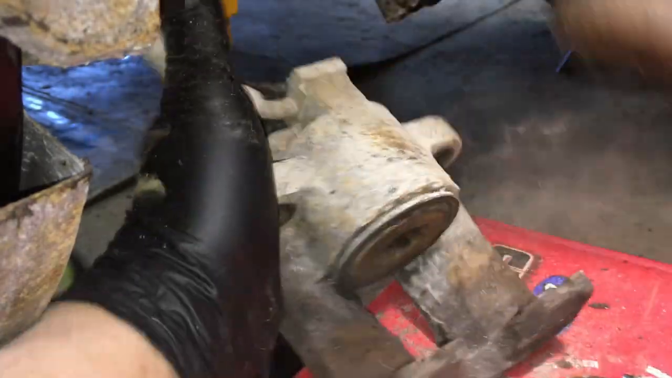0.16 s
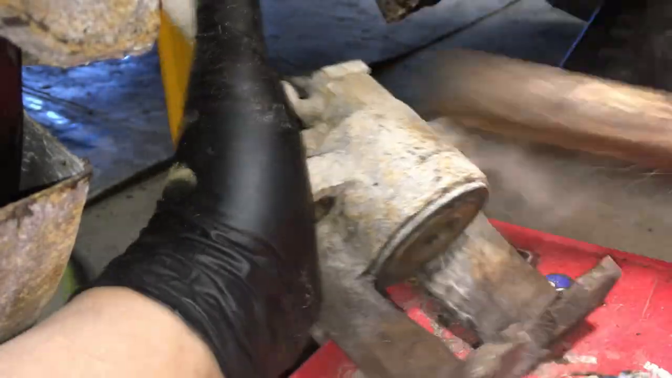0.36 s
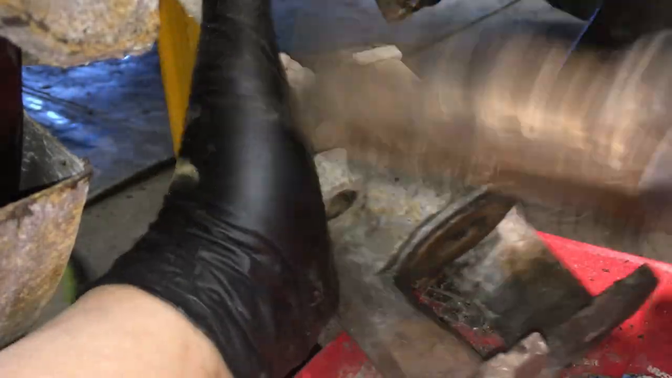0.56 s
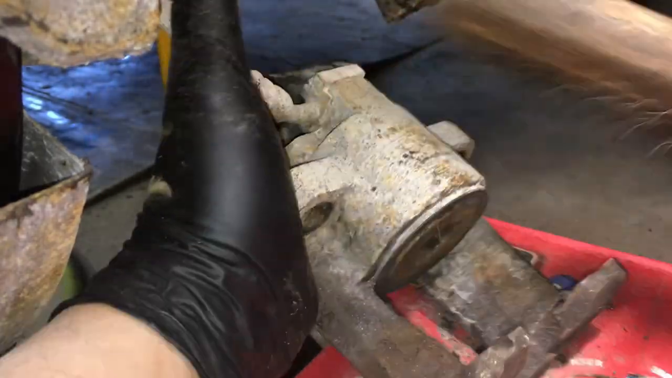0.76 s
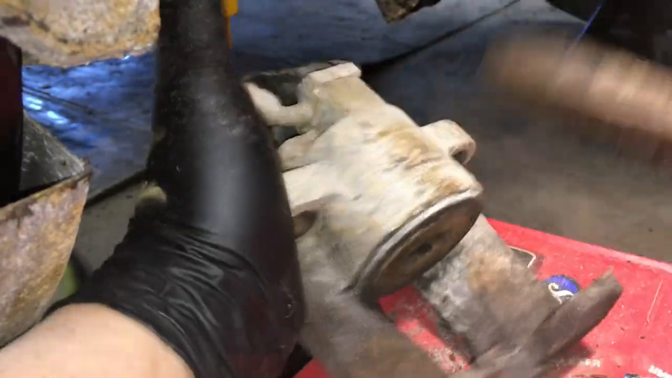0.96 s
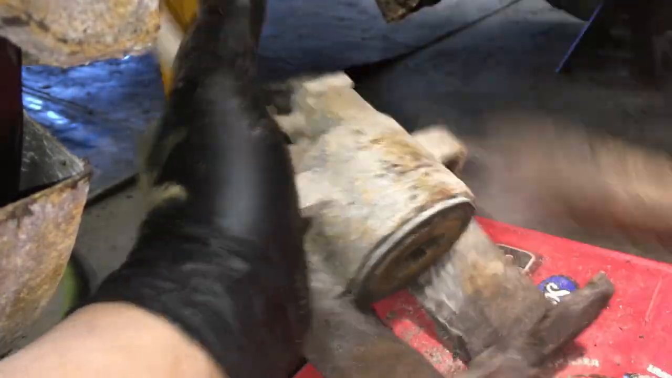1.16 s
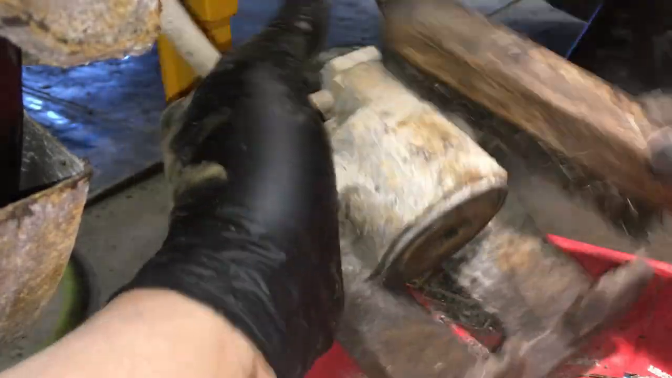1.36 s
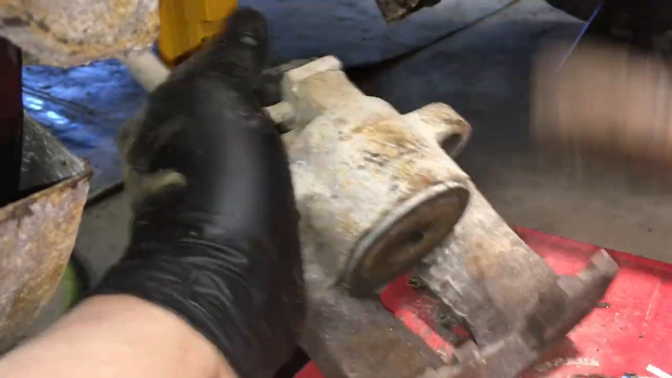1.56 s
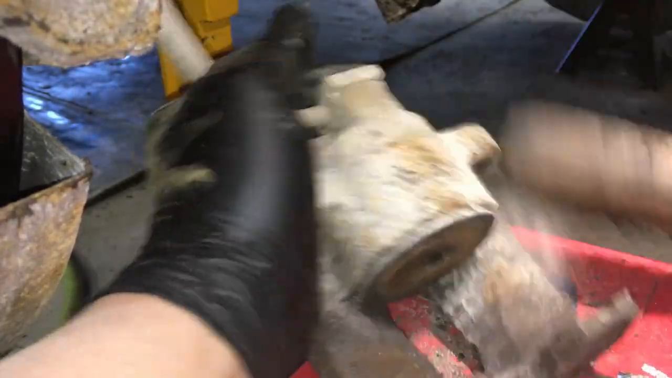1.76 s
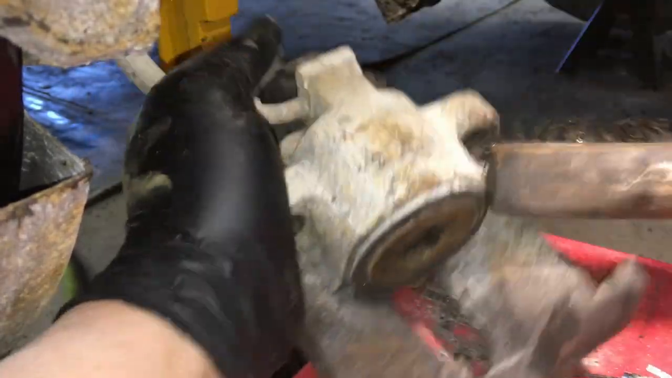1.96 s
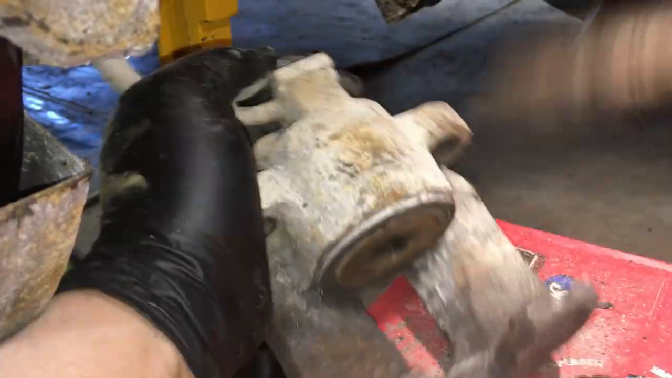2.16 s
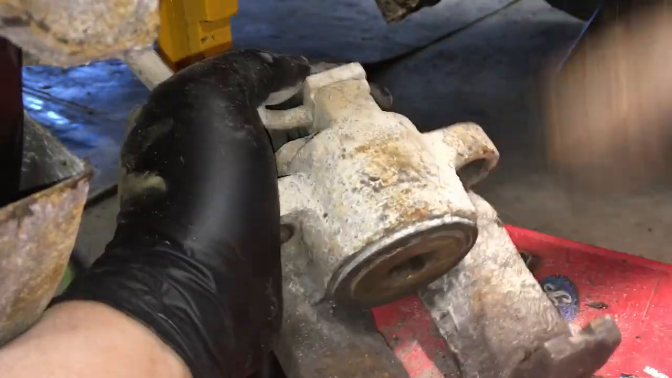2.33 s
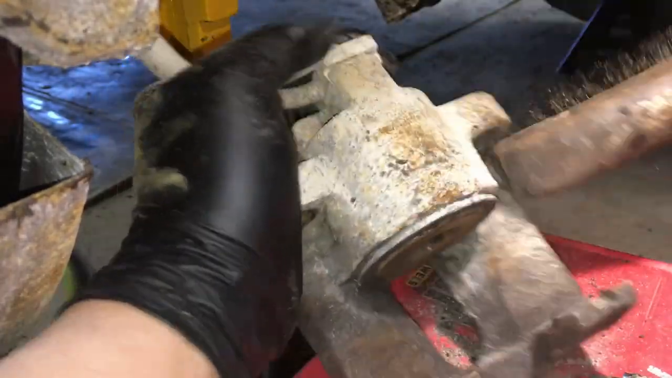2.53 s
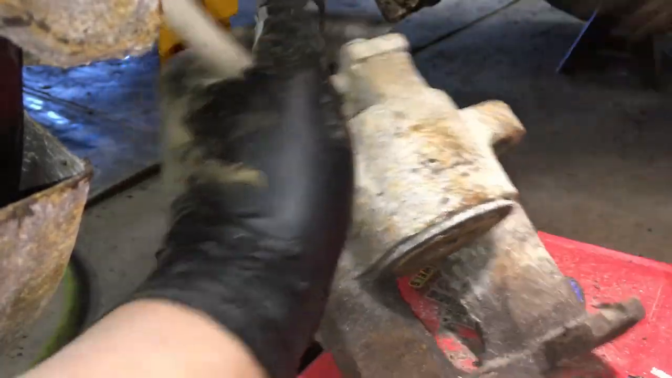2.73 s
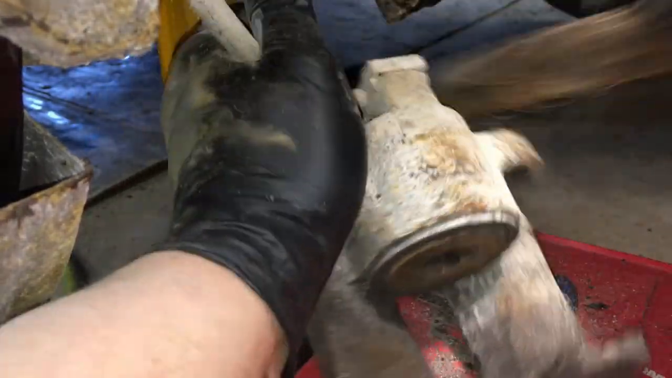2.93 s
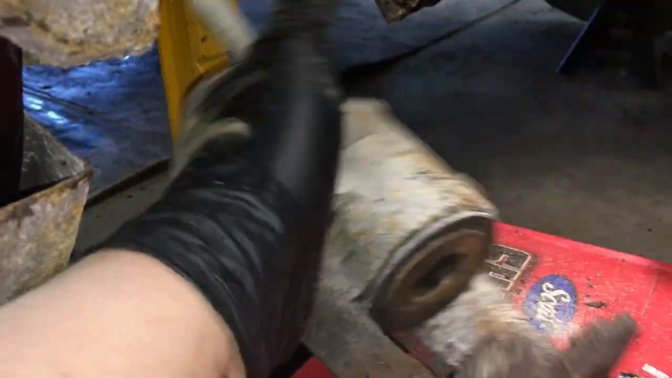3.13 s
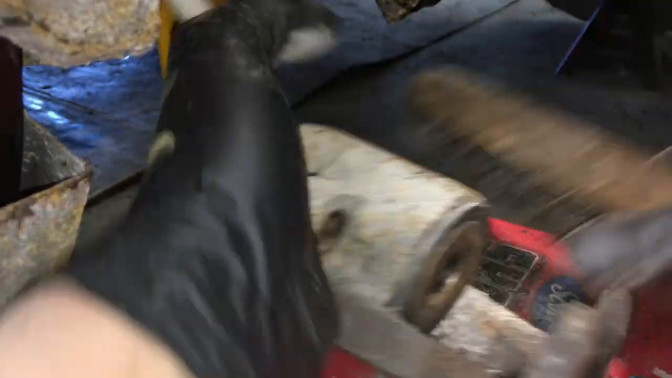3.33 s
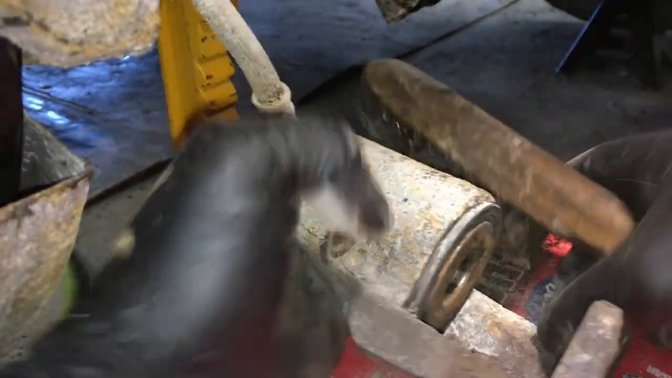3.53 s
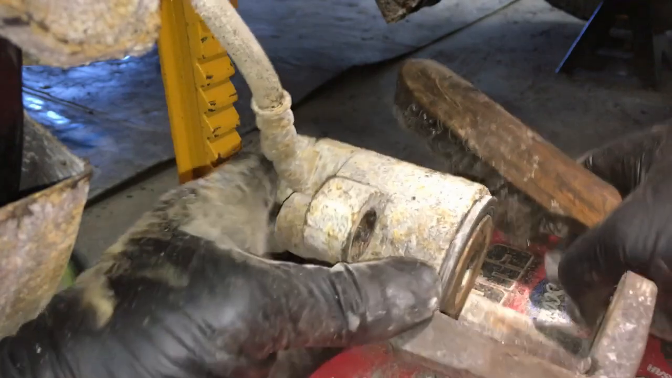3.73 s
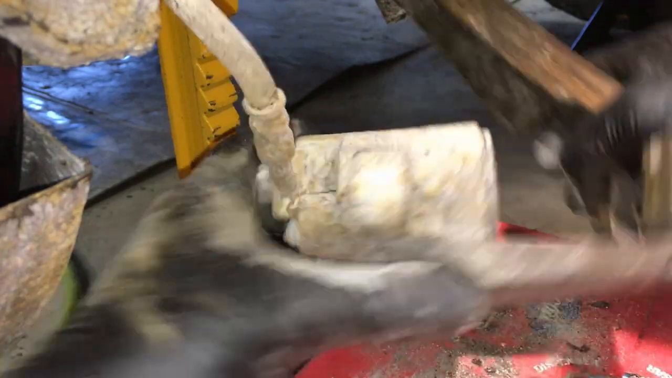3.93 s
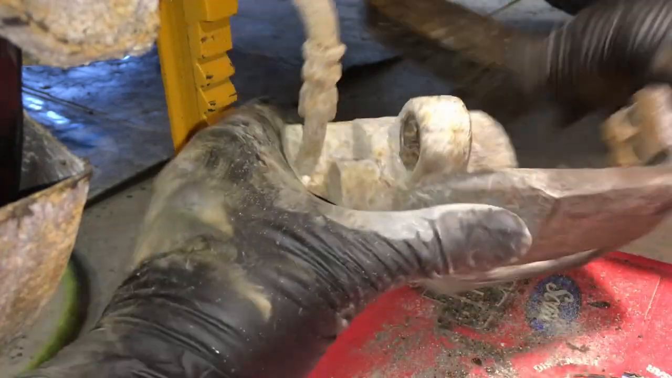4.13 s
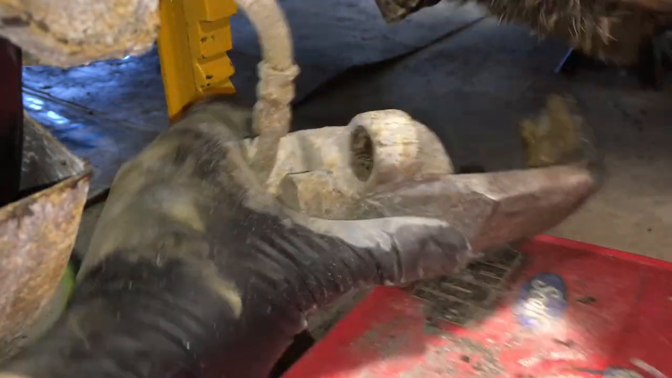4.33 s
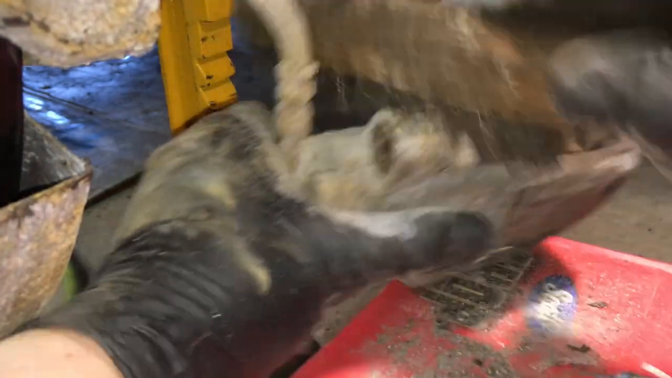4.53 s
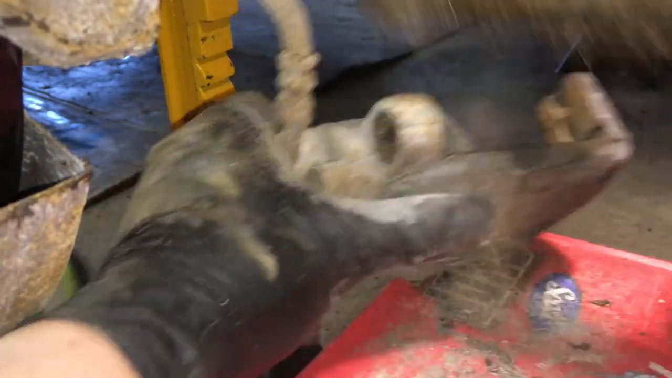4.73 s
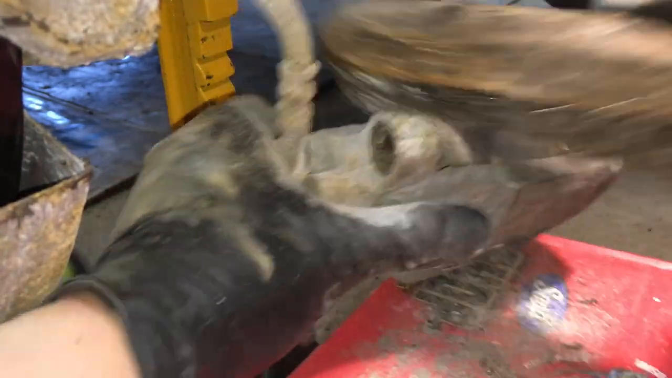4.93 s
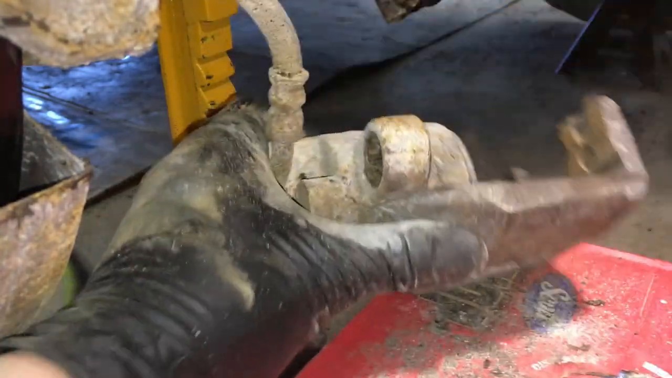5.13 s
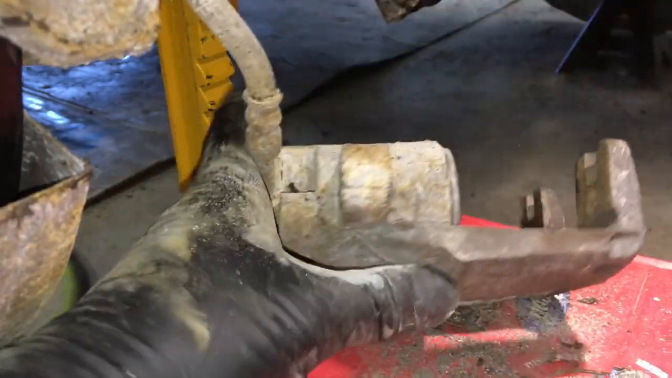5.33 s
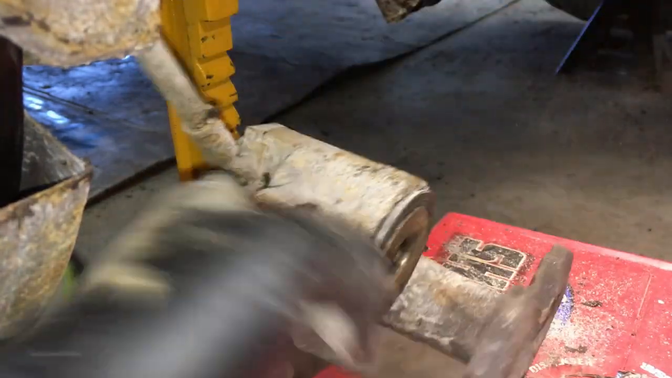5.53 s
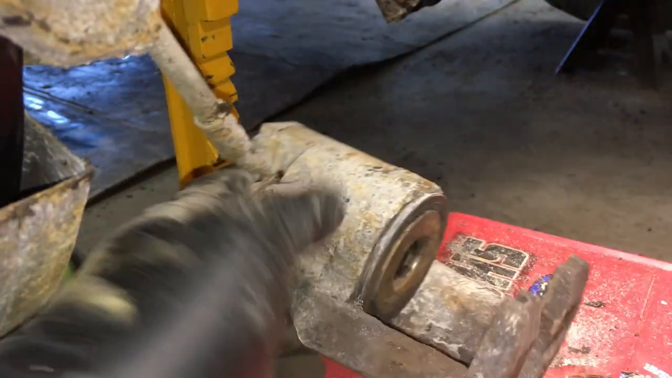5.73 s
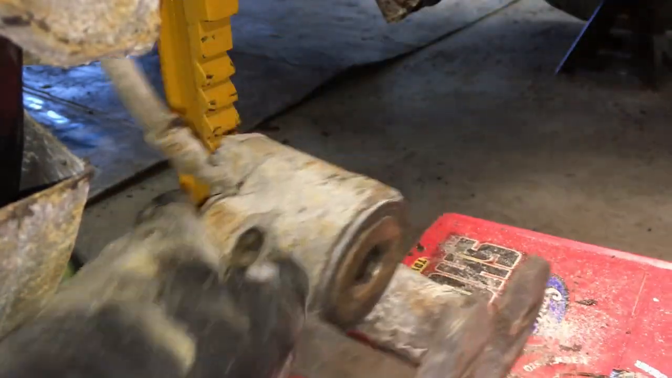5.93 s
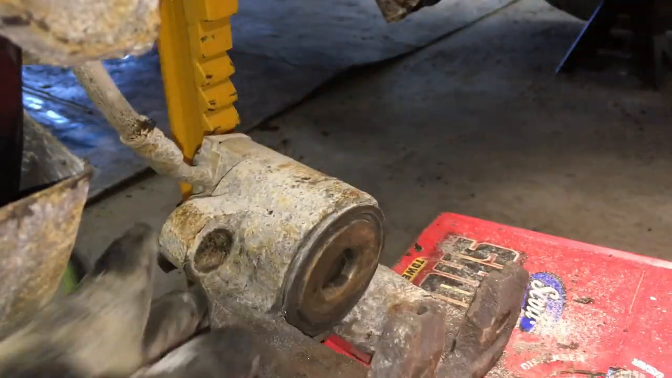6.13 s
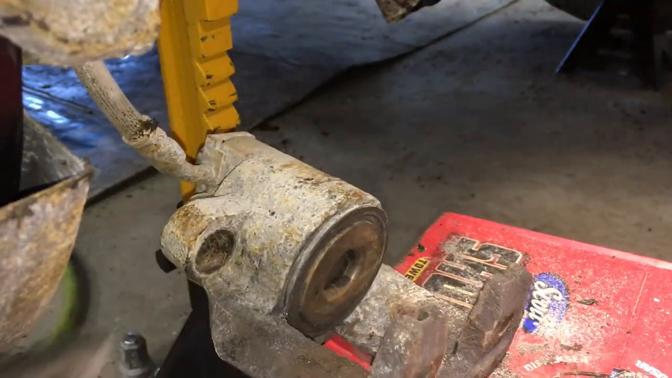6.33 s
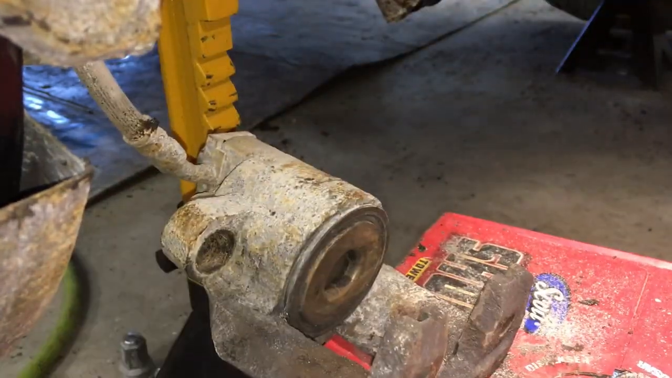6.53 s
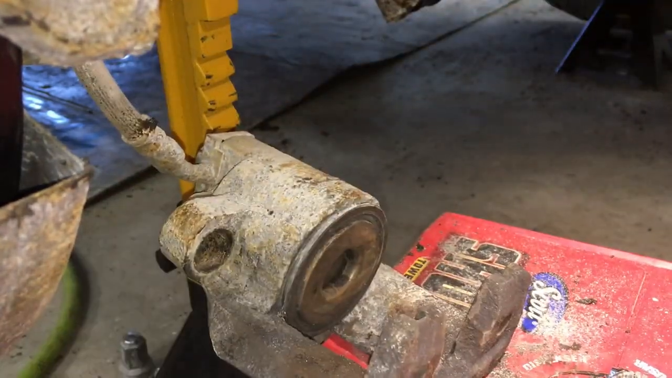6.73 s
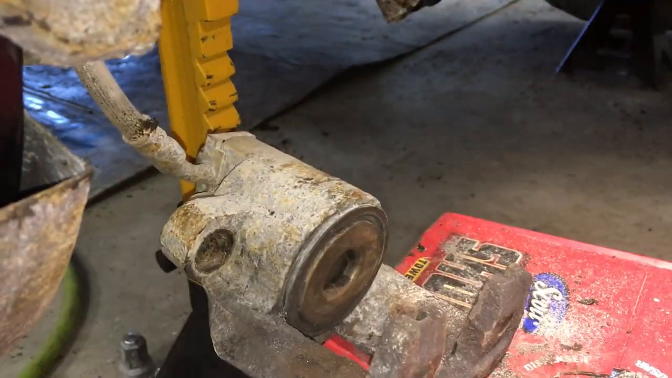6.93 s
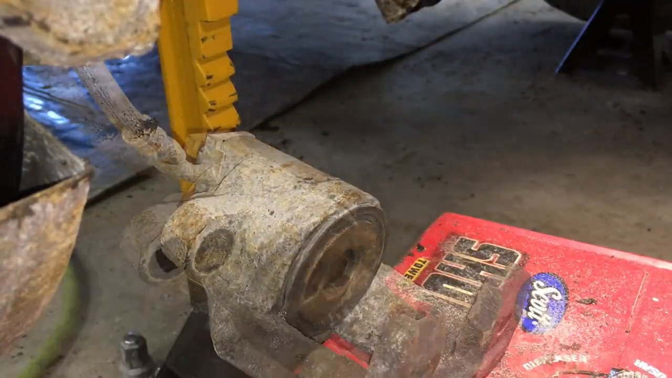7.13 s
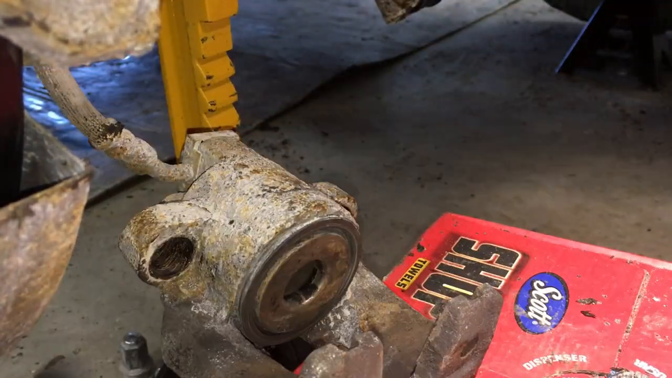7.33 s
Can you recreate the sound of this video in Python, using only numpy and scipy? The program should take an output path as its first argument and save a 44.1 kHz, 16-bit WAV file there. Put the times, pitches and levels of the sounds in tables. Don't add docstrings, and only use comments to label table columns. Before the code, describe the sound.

Close up in a garage, bristles rasp back and forth over rough metal, some bursts swelling and others striking and skidding out. Dull cardboard drumming and woody clacks accompany the early strokes. Around the middle the part is turned, with sparser scrapes, then heavier brushing and crackling clicks return. The last second or so holds only faint rubs and low background hush, nearly mono.

```python
import sys
import numpy as np
from scipy import signal
from scipy.io import wavfile
from scipy.ndimage import uniform_filter1d

SR = 44100
rng = np.random.default_rng(int(sys.argv[2]) if len(sys.argv) > 2 else 0)


def rack_gain(trim_db):
    fader = np.asarray(trim_db, float)
    return 10 ** (fader / 20)


def master_out(mix):
    frames = np.transpose(np.atleast_2d(mix))
    ceiling = np.clip(frames, -1, 1)
    pcm = np.round(ceiling * 32767).astype(np.int16)
    wavfile.write(sys.argv[1], SR, pcm)


N = 325308

# hz, level_db (per Hz)
SCRATCH_SPECTRUM = [(900, -36.5), (2200, 3.5), (2810, -6), (3430, 1), (4830, -2.5), (9310, -0.5),
                    (10500, -3), (12000, 2), (14700, 0.5), (15600, 1.5), (16000, -36.5)]
# hz, level_db (per Hz)
RASP_SPECTRUM = [(300, -24), (470, -6), (725, -5), (1030, -2), (1790, -4), (2170, -5), (2800, -7),
                 (5000, -18), (9000, -66.5)]
# pitch_hz, width_hz, level_db
WIRE_MODES = [(3195, 410, -11), (5750, 650, -8), (9550, 500, -3.5), (11200, 970, -6)]
# pitch_hz, width_hz, level_db
HANDLE_MODES = [(583, 160, 2), (713, 180, 0), (927, 600, -1), (1376, 190, -1)]
# pitch_hz, width_hz, level_db
AIR_MODES = [(52.7, 31, 6.5), (90.2, 87, -2)]
# start_s, peak_db, ring_hz
GRIT_TICKS = [(6.198, -15.5, 6240), (6.3464, -25, 5830), (6.3632, -22, 5900), (6.393, -24, 5460),
              (6.456, -29, 4500), (6.608, -39, 6500), (6.647, -27, 5200)]
NEEDLE = 3.5


def evened(x):
    return x / np.sqrt(np.mean(x ** 2) + 1e-20)


def read(points, hz):
    f, value = np.transpose(points)
    return np.interp(np.log(hz + 1), np.log(f + 1), value)


def add(mix, s, sound):
    part = mix[max(round(s * SR), 0):][:len(sound)]
    part += sound[:len(part)]


def colour(x, points):
    hz = abs(np.fft.fftfreq(4096, 1 / SR))
    log_gain = np.log(rack_gain(np.maximum(read(points, hz), -100)))
    taps = np.fft.ifft(np.exp(np.conj(signal.hilbert(log_gain)))).real[:2048]
    return signal.oaconvolve(x, taps)[:len(x)]


def resonate(x, hz, width):
    r = np.exp(-np.pi * width / SR)
    return 2 * signal.lfilter([1 - r], [1, -r * np.exp(2j * np.pi * hz / SR)], x).real


def split_band(x, hz, kind):
    return signal.sosfilt(signal.butter(2, hz, kind, fs=SR, output="sos"), x)


def wobble(seconds):
    size = max(round(seconds * SR), 1)
    smooth = uniform_filter1d(rng.standard_normal(N), size)
    return evened(uniform_filter1d(smooth, size))


def mottle(x, depth_db):
    z = signal.stft(x, nperseg=256, noverlap=192)[2]
    patches = uniform_filter1d(rng.standard_normal(z.T.shape), 14, 0)
    patches = uniform_filter1d(patches, 6, 1).T
    z = z * rack_gain(depth_db * evened(patches))
    return evened(signal.istft(z, nperseg=256, noverlap=192)[1][:N])


def brush():
    scratch_db, rasp_db, drum_db, bright_db = contact()
    grip_db = 1.94 * wobble(0.0012) + 2.3 * wobble(0.0049)
    grip = rack_gain(grip_db)
    wires = slips(3000, 1.2, 1.6) * grip
    scratch = wire_scratch(wires, grip, bright_db) + lifted_casting(wires, grip_db)
    rasp = casting_rasp(wires, grip, rasp_db) * rack_gain(rasp_db + 1.13)
    flick_db = -16 - 0.26 * rasp_db
    push = rng.standard_normal(N) * grip
    drum_rms = np.std(panels(push))
    drum = panels(push * rack_gain(scratch_db + drum_db - 0.5)) / drum_rms
    return rack_gain(scratch_db - 1.9) * (scratch + rasp + flicks() * rack_gain(flick_db)) + drum


def contact():
    # start_s, length_s, peak_db, weight_db
    sweeps = [(0.0, 0.06, -32.5, -4), (.066, 0.089, -35.5, -3.5), (.614, 0.074, -37, 0),
              (.791, 0.015, -21.5, -14), (1.281, 0.063, -29.5, -5.5), (1.369, 0.0077, -17, -6),
              (2.598, 0.066, -31.5, -5), (2.787, 0.17, -48, -7), (3.029, 0.062, -32.5, -3),
              (3.448, 0.05, -42.5, -1), (3.86, 0.068, -32.5, -2.5), (4.007, 0.12, -46, -8.5),
              (4.25, 0.053, -45.5, -11.5), (4.535, 0.098, -44, 7.5), (5.299, 0.065, -33.5, 2),
              (5.528, 0.026, -47, 17), (5.612, 0.064, -31.5, 0), (5.806, 0.14, -50, 3),
              (6.023, 0.041, -30, -5.5), (7.25, 0.125, -54.5, 10.5)]
    # start_s, length_s, peak_db, weight_db
    skids = [(.32, 0.051, -37.5, -4), (.706, 0.0086, -34, 5.5), (.952, 0.06, -32.5, 1),
             (1.075, 0.034, -24.5, -5.5), (1.187, 0.15, -47, 3.5), (1.383, 0.12, -36, 0.5),
             (1.465, 0.16, -39, 0), (1.626, 0.04, -27, -2.5), (1.691, 0.21, -50, -5),
             (1.819, 0.018, -48, 13), (1.966, 0.15, -46, 0), (2.221, 0.012, -36, 10.5),
             (2.442, 0.12, -55, -17), (2.664, 0.024, -33, 15.5), (3.096, 0.16, -31.5, 0.5),
             (3.33, 0.099, -29.5, -3), (3.508, 0.071, -27.5, -3.5), (4.44, 0.092, -47.5, 5.5),
             (4.637, 0.034, -45, -1), (4.718, 0.17, -30.5, -2), (5.177, 0.024, -46, 12),
             (5.367, 0.041, -34, 2.5), (5.448, 0.03, -51.5, 25), (5.687, 0.095, -29.5, -3.5),
             (5.889, 0.063, -31.5, -5), (6.064, 0.18, -25.5, -7)]
    # start_s, length_s, level_db, weight_db
    scrubs = [(.196, 0.12, -34.5, -2), (.406, 0.22, -38.5, -1), (.809, 0.057, -33.5, -5),
              (1.05, 0.027, -39.5, 5), (1.572, 0.046, -34, -14.5), (1.852, 0.11, -38, -5.5),
              (2.126, 0.067, -49, -8.5), (2.27, 0.043, -43, 1.5), (2.332, 0.013, -37, -11),
              (2.379, 0.058, -37.5, -2.5), (2.709, 0.054, -44.5, -5), (2.95, 0.074, -44, 1.5),
              (3.269, 0.046, -41, -5), (3.659, 0.088, -45.5, -3), (4.182, 0.014, -49.5, -2.5),
              (4.386, 0.037, -35.5, 4), (4.678, 0.036, -42.5, -8.5), (5.04, 0.07, -47.5, -11.5),
              (5.097, 0.078, -35.5, -3), (6.338, 0.17, -51.5, -4), (6.69, 0.084, -60, -5.5),
              (7.03, .05, -72, -4), (6.88, 0.043, -71, -5), (7.175, 0.037, -65, -1.5)]
    # start_s, light_drag_db, brush_angle_brightness_db, seat_on_box_db
    hands = [(0, -48.5, 0, 1), (.76, -56, -1.5, -3), (1.2, -53, -3, -1), (1.8, -95, -8.5, -1.5),
             (2.3, -46, -3, 8), (2.56, -58.5, -3, 3), (2.9, -53.5, -1.5, -2.5), (3.5, -54, -4.5, -2.5),
             (4.2, -56, -9, -7), (4.35, -61, -3, -9.5), (5, -57, -8, 1.5), (5.5, -53.5, -6.5, -4.5),
             (6, -49, -7, -0.5), (6.5, -68, -11.5, -4.5), (6.55, -60, -14, 2), (6.75, -70, -22, -2),
             (7.16, -74, -16, -1), (7.38, -55, -29, -11)]
    touch_s, lift_db_per_s = 0.016, 1208
    t = np.arange(0, N / SR + .002, .001)
    hand_s = np.array(hands)[:, 0]
    drag_db, angle_db, seat_db = (np.interp(t, hand_s, v) for v in np.transpose(hands)[1:])
    power = rack_gain(2 * drag_db)
    load = power * -1
    for rows, swell_db, skid_db, lifts in ((sweeps, 13, 0, 1), (skids, 0, 15, 0), (scrubs, 0, 0, 1)):
        s, length, db, weight_db = np.transpose(rows)[:, :, None]
        done = np.maximum(t - s, 0) / length
        level_db = db - swell_db * (1 - np.minimum(done, 1)) - skid_db * done
        level_db = level_db - lifts * lift_db_per_s * np.maximum(t - s - length, 0)
        onset = np.clip((t - s) / touch_s + .5, 0, 1)
        part = rack_gain(2 * np.maximum(level_db, -150)) * onset ** 2
        power = power + part.sum(0)
        load = load + (part * weight_db).sum(0)
    weight_db = uniform_filter1d(load / power, 9)
    scratch_db = 10 * np.log10(power)
    drum_db = 1.48 * weight_db + seat_db
    bright_db = angle_db - 0.61 * weight_db
    curves = scratch_db, weight_db, drum_db, bright_db
    return [np.interp(np.arange(N) / SR, t, c) for c in curves]


def slips(per_s, spread_db, fizz):
    size = rack_gain(spread_db * np.minimum(rng.exponential(1, N), 4)) * rng.choice([-1., 1.], N)
    clicks = evened(size * (rng.random(N) < per_s / SR))
    return clicks + fizz * rng.standard_normal(N)


def wire_scratch(wires, grip, bright_db):
    hiss = mottle(colour(wires, SCRATCH_SPECTRUM), 3.4)
    rings = 0
    for hz, width, db in WIRE_MODES:
        level = rack_gain(db + 5.0 * wobble(0.098))
        drive = slips(140, 1.3, 0) * grip + 0.31 * wires
        rings = rings + level * evened(resonate(drive, hz, width))
    lone = evened(colour(slips(110, 1.7, 0), SCRATCH_SPECTRUM))
    scratch = evened(hiss + 0.13 * rings + 0.38 * lone)
    low = split_band(scratch, 7500, "low")
    sing = rack_gain(1.7 * wobble(0.037) - 0.3 * np.clip(bright_db, -6, 6) - 3.0)
    brush_on = np.arange(N) / SR < 5.8
    low = low + sing * resonate(low, *WIRE_MODES[0][:2]) * brush_on
    high = split_band(scratch, 7500, "high")
    share = 1 / (1 + rack_gain(2 * bright_db))
    balanced = np.sqrt(share) * evened(low) - np.sqrt(1 - share) * evened(high)
    return balanced + rack_gain(-1.0) * singing(hiss)


def singing(scratch):
    # start_s, length_s, level_db (re scratch), pitch_hz
    drags = [(0.534, 0.041, 0.5, 3130), (.604, 0.0078, 6, 3170), (0.814, 0.023, 1.5, 3140),
             (1.855, 0.1, -4, 3100), (2.183, 0.011, 17.5, 3480), (2.333, 0.018, 1, 3740),
             (2.686, 0.063, 3.5, 3900), (3.09, 0.073, -13, 3840), (4.735, 0.074, -4, 3480),
             (5.061, 0.055, 5.5, 3460), (5.166, .025, -3, 3380), (6.88, 0.045, 6, 2140),
             (6.886, 0.058, 5, 1580)]
    t, out = np.arange(N) / SR, 0
    for s, length, db, hz in drags:
        width = 0.18 * hz
        gate = np.clip(np.minimum(t - s, s + length - t) / 0.016 + .5, 0, 1)
        tone = resonate(resonate(scratch, hz, width), hz, 2 * width)
        out = out + rack_gain(db) * gate * evened(tone)
    return out


def lifted_casting(wires, grip_db):
    # start_s, end_s
    clear = [
        (2.84, 2.935),
        (6.87, 6.96),
    ]
    t = np.arange(N) / SR
    free = sum((t > a) & (t < b) for a, b in clear)
    return free * rack_gain(-3 + grip_db) * evened(resonate(wires, 2190, 400))


def casting_rasp(wires, grip, rasp_db):
    rasp = mottle(colour(0.38 * wires + slips(1500, 1.0, 0.95) * grip, RASP_SPECTRUM), 2.2)
    wood = evened(sum(rack_gain(db) * resonate(rasp, hz, w) for hz, w, db in HANDLE_MODES))
    return (rasp + rack_gain(1.43 * rasp_db - 11.0) * wood) / np.sqrt(1 + rack_gain(rasp_db - 3.0) ** 2)


def flicks():
    per_s = 78 / len(WIRE_MODES)
    ticks = sum(evened(resonate(slips(per_s, 1.5, 0), hz, 0.3 * w)) for hz, w, _ in WIRE_MODES)
    return evened(split_band(ticks, 2800, "high"))


def panels(push):
    # pitch_hz, width_hz, level_db
    panel_modes = [(172, 48, 2), (240, 90, 2), (310, 85, 2)]
    return sum(rack_gain(db) * resonate(resonate(push, hz, w), hz, 2 * w) for hz, w, db in panel_modes)


def snaps():
    # start_s, peak_db, knock_db (re peak)
    long_snaps = [(0.253, -14, -3), (0.511, -16, -33), (1.052, -19, -9.5), (1.0776, -21.5, 4.5),
                  (1.282, -18.5, -11), (1.3716, -5.5, -5), (1.856, -23, -7), (1.946, -29, -29),
                  (2.187, -18.5, -12), (3.0593, -17.5, -18.5), (3.112, -11, -1.5), (3.173, -19, -25),
                  (3.2134, -14, -28), (3.915, -13, -25), (4.7137, -26, -21), (5.0436, -13.5, -15.5),
                  (5.4523, -12.5, -6.5)]
    # start_s, peak_db, knock_db (re peak)
    mid_snaps = [(1.474, -13.5, -13.5), (3.324, -17, -10), (3.3378, -2, -12), (3.3776, -14, -0.5),
                 (3.732, -16.5, -7), (3.8738, -13, -22), (4.8462, -9, -44), (5.544, -13.5, -6),
                 (5.687, -7, -14.5), (5.7581, -10.5, -43), (5.9389, -14, -38), (6.0189, -12, -19),
                 (6.0391, -16.5, -7), (6.0624, -8, -29), (6.073, -11, -32), (6.087, -20, -34),
                 (6.1394, -4, -20)]
    # start_s, peak_db, knock_db (re peak)
    short_snaps = [(.021, -7.5, -35), (0.0983, -3.5, -24.5), (0.2362, -17, -13), (0.798, -4.5, -38),
                   (1.505, -11.5, -16), (2.2183, -18, -34), (2.3031, -11, -19), (2.6636, -22, 5),
                   (2.7503, -8.5, -43), (2.953, -18.5, -11), (3.4065, -14, -18), (3.515, -9, -41),
                   (4.896, -17.5, -6.5), (5.2802, -20.5, -5), (5.889, -14.5, -25)]
    # start_s, peak_db
    stub_snaps = [(0.2028, -3.5), (0.6598, -10), (0.9539, -14.5), (2.3967, -19), (2.4158, -7.5),
                  (2.642, -10), (2.826, -11.5), (3.2795, -12)]
    snap_hz = [3830, 6600, 9600, 13000]
    tick_knock_db = -23.5
    rows = []
    for table, hz in zip((long_snaps, mid_snaps, short_snaps), snap_hz):
        rows += [(s, db, hz, knock_db) for s, db, knock_db in table]
    rows += [(s, db, snap_hz[-1], tick_knock_db) for s, db in stub_snaps]
    rows += [(*tick, tick_knock_db) for tick in GRIT_TICKS]
    out, t = np.zeros(N), np.arange(2200) / SR
    grit = rng.standard_normal((len(rows), 2, len(t)))
    fade = rack_gain(-60 * t / 0.0051) + 0.23 * rack_gain(-60 * t / 0.044)
    fade = fade * np.minimum(t / 0.00042, 1)
    grit[:, :, 8] = NEEDLE
    fade[8] = 1
    for (s, db, hz, knock_db), (a, b) in zip(rows, grit):
        crack = colour(a * fade, SCRATCH_SPECTRUM)
        crack = crack + 3.8 * resonate(crack, hz * (1 + .04 * b[0]), 1400)
        knock = colour(b * fade, RASP_SPECTRUM)
        knock = rack_gain(knock_db + 4.0) * knock / abs(knock).max()
        add(out, s, rack_gain(db - 2.0) * (crack / abs(crack).max() + knock))
    return out


def tips():
    # start_s, peak_db, ring_hz
    sprung_tips = [(0.0387, -9, 8300), (0.0491, -4, 14200), (0.0553, -14, 9300), (0.0606, -2.5, 14000),
                   (0.0934, -26, 9400), (0.1191, -16, 15200), (0.1229, -18, 11300), (0.1332, -9, 9900),
                   (0.1465, -22, 14500), (0.2465, -7, 13900), (0.2559, -7, 15100), (0.3046, -11, 9900),
                   (0.3164, -15, 9250), (0.4072, -21, 2980), (0.4115, -17, 14100), (0.4168, -13, 8400),
                   (0.4832, -19, 14500), (0.5793, -13, 14700), (0.5899, -16, 14000), (0.8059, -3, 9000),
                   (1.0763, -9, 2400), (1.3299, -18, 13000), (1.39, -25, 2600), (1.6343, -12, 11300),
                   (1.8719, -20, 3400), (1.9469, -6, 9200), (2.2194, -9.5, 11000), (2.3869, -15.5, 14200),
                   (2.4048, -6, 10700), (2.4325, -7, 9600), (2.609, -14, 2600), (2.6632, -6, 15000),
                   (2.6733, -9, 9600), (2.6827, -14, 9400), (2.7512, -12, 14300), (2.8964, -17.5, 9000),
                   (2.9235, -33, 2700), (2.9638, -14, 14300), (2.9773, -14, 14800), (3.1654, -9, 11700),
                   (3.1743, -6.5, 13000), (3.183, -11.5, 2280), (3.2548, -17.5, 15000), (3.3009, -24, 12400),
                   (3.3777, -0.5, 7460), (3.4065, -7.5, 7460), (3.4321, -15.5, 2660), (3.5233, -11, 9600),
                   (3.576, -14.5, 3280), (3.613, -15, 7000), (3.842, -18.5, 5770), (4.681, -20.5, 3910),
               (4.912, -13.5, 6600), (5.1, -27, 3500), (1.377, -8, 3870), (5.375, -10, 5280),
               (5.6918, -1.5, 6450), (6.2404, -21, 4020), (6.273, -24, 5790), (6.4124, -25, 5500),
                   (5.559, -15, 6040), (5.6438, -17, 2400), (5.6706, -13, 11200), (5.7052, -9, 12100),
                  (5.7215, -8, 11800), (5.7328, -7, 6200), (5.7745, -7, 6300), (5.8198, -18, 7200),
                  (5.8652, -17, 6300), (5.8744, -19, 8800), (5.9115, -8, 6700), (5.9172, -11, 6400),
                  (6.0305, -12, 5600), (6.067, -9, 5900), (6.0966, -12, 4100), (6.1098, -14, 4400),
                  (6.1154, -13, 3400), (6.1209, -13, 3800), (6.179, -5.5, 7100), (6.205, -10, 4600)]
    rows = sprung_tips + GRIT_TICKS
    out, t = np.zeros(N), np.arange(600) / SR
    fade = rack_gain(-60 * t / 0.00056) + 0.089 * rack_gain(-60 * t / 0.02)
    grit = rng.standard_normal((len(rows), len(t))) * fade * np.minimum(t / 0.00022, 1)
    grit[:, 4] = NEEDLE
    for (s, db, hz), a in zip(rows, grit):
        tick = colour(a, SCRATCH_SPECTRUM)
        tick = tick + 7.9 * resonate(tick, hz, 1400)
        add(out, s, rack_gain(db - 4.0) * tick / abs(tick).max())
    return out


def thumps():
    # start_s, peak_db, drum_hz, woody_clack_db (re peak)
    drops = [(0.2371, -13, 169, -7.5), (.275, -26, 204, -1), (.838, -11, 183, -6), (.8385, -13, 1010, -31),
             (0.953, -20, 189, -3), (1.025, -25, 310, -13), (1.316, -25, 224, -21.5), (1.368, -41, 326, 13),
             (1.514, -29.5, 157, -4), (1.6242, -16, 970, -30), (1.6313, -10, 168, -13),
             (1.725, -39, 160, -3), (1.854, -25.5, 114, -3.5), (1.942, -9.5, 173, -15.5),
             (2.2232, -17, 199, -30), (2.393, -23.5, 305, -6), (2.661, -22, 213, -12),
             (2.7439, -20.5, 173, -8.5), (3.108, -25, 246, -13), (3.1751, -19, 171, -4),
             (3.321, -28, 155, -24), (3.379, -25, 241, -5), (3.431, -30, 295, -1), (4.38, -21.5, 403, -7),
             (4.3875, -15, 696, -16), (4.399, -25, 533, -16), (4.41, -41, 703, -1), (4.436, -41, 331, 1),
             (4.723, -31.5, 262, 4), (5.111, -28, 118, 3), (5.351, -29, 321, 5.5),
             (5.696, -27.5, 272, -7.5), (5.777, -29, 265, -6), (5.885, -28, 273, -3), (6.07, -28, 288, -14),
             (6.15, -28.5, 218, -1)]
    out, t = np.zeros(N), np.arange(12000) / SR
    chance = rng.random((len(drops), 3))
    grit = rng.standard_normal((len(drops), len(t))) * rack_gain(-60 * t / 0.046)
    sag = t + 0.001 * (1 - np.exp(-t / 0.016))
    swell = t / 0.023 * np.exp(1 - t / 0.016)
    for (s, db, hz, clack_db), (a, b, c), tap in zip(drops, chance, grit):
        t60_s = 0.11 * rack_gain(-0.48 * (db + 27.0)) * min(1, 320 / hz)
        fade = rack_gain(-60 * t / t60_s) * np.minimum(t * hz / 0.76, 1)
        panel = np.sin(2 * np.pi * hz * sag)
        panel = panel + 0.25 * np.sin(2 * np.pi * (hz * (1.2 + .35 * a) * sag + b))
        wide_face = np.sin(2 * np.pi * hz * (0.66 + 0.14 * c) * sag)
        panel = panel + 0.5 * np.minimum(t / 0.015, 1) * wide_face
        air = np.sin(2 * np.pi * AIR_MODES[0][0] * sag)
        air = swell * (air + 0.37 * np.sin(2 * np.pi * (AIR_MODES[1][0] * sag + c)))
        clack = sum(rack_gain(g_db) * resonate(resonate(tap, f, w), f, 2 * w) for f, w, g_db in HANDLE_MODES)
        clack = rack_gain(clack_db + 0.5) * clack / abs(clack).max()
        add(out, s, rack_gain(db) * (panel * fade + rack_gain(-21.5) * air + clack))
    return out


def knocks():
    # start_s, peak_db, settling_hz
    edges = [(.281, -20, 92), (.51, -16.5, 100), (.806, -23, 95), (1.0505, -19, 100), (1.387, -21, 100),
             (1.6285, -13, 115), (1.6462, -16, 105), (1.9648, -22, 115), (2.1252, -31, 120),
             (2.2178, -14, 125), (3.7755, -38, 130), (3.785, -37, 100)]
    out, rise_cycles, lead_cycles = np.zeros(N), 0.39, 1.13
    for s, db, hz in edges:
        u = np.arange(SR // 10) / SR * hz / rise_cycles
        cycles = rise_cycles * u + lead_cycles * (1 - np.exp(-u))
        add(out, s, rack_gain(db) * u * np.exp(1 - u) * np.sin(2 * np.pi * cycles))
    return out


def lurches():
    # start_s, peak_db, pitch_hz
    sways = [(0.179, -36.5, 84.6), (0.243, -31, 46), (0.499, -36, 83), (0.8, -34, 86), (0.838, -31, 59.2),
             (1.039, -29.5, 86.6), (1.099, -34, 63), (1.29, -37, 69), (1.365, -26, 64.6),
             (1.629, -25, 64.7), (1.715, -31, 53.8), (1.857, -38, 76), (1.942, -32, 59.2),
             (2.219, -30, 85.4), (2.741, -34, 83.4), (2.989, -41.5, 82.5), (3.6, -45, 55),
             (3.876, -42.5, 70.0), (4.422, -37, 77), (4.56, -39.5, 75.4), (4.727, -38, 83),
             (4.789, -36, 81), (4.921, -45, 72), (5.04, -36, 80.4), (5.098, -40, 78), (5.775, -44, 104)]
    out, t, rise_s = np.zeros(N), np.arange(9000) / SR, 0.012
    swell = (t / rise_s * np.exp(1 - t / rise_s)) ** 2.0
    for (s, db, hz), c in zip(sways, rng.random((len(sways), 1))):
        add(out, s, rack_gain(db + 1.8) * swell * np.sin(2 * np.pi * (hz * t + c)))
    return out


def box():
    # start_s, level_db
    rocking = [(0, -3.5), (1.4, 3.5), (2.5, -14), (3.3, -20), (3.8, 5.5), (4.3, -22), (5, 6), (5.6, -21),
               (6.3, -3), (7.38, 2)]
    scratch_db, _, drum_db, _ = contact()
    heave = uniform_filter1d(rack_gain(2 * (scratch_db + drum_db)), round(0.21 * SR))
    heave_db = 10 * np.log10(abs(heave) + 1e-12)
    shake = rng.standard_normal(N) * rack_gain(4.5 * wobble(0.011))
    boom = sum(rack_gain(db) * resonate(resonate(shake, hz, w), hz, 2 * w) for hz, w, db in AIR_MODES)
    boom = split_band(boom, 30, "high")
    loose_db = np.interp(np.arange(N) / SR, *np.transpose(rocking))
    return evened(boom) * rack_gain(0.94 * (heave_db + 49.5) - 38.5 - 14 + loose_db)


def stand():
    # pitch_hz, level_db (rms)
    steel_modes = [(441.4, -58.5), (866.7, -65), (1050, -64), (1281, -68), (1470, -68), (1766, -71),
                   (2062, -67), (2439, -70)]
    # start_s, level_db
    rub = [(6.3, -20), (6.335, -2), (6.44, 0), (6.51, 1), (6.56, -6), (6.59, -30)]
    t, ring = np.arange(N) / SR, 0
    wake = np.clip((t - 6.41) / 0.043, 0, 1)
    glide = t - .02 * (t - 6.45) ** 2
    for k, (hz, db) in enumerate(steel_modes):
        level = rack_gain(db + 2.2 * wobble(0.02)) * np.sqrt(2)
        tone = np.sin(2 * np.pi * (hz * glide + 0.03 * wobble(0.03)))
        ring = ring + level * tone * (wake if k else 1)
    return ring * rack_gain(np.interp(t, *np.transpose(rub), left=-90, right=-90))


def garage(x):
    # hz, t60_s
    decay = [(200, 0.47), (2000, 0.22), (12000, 0.16)]
    taps = np.zeros(SR // 2)
    at = np.arange(200, SR // 2 - 20, 20)
    taps[at + rng.integers(0, 20, len(at))] = rng.choice([-1., 1.], len(at))
    hz, t, z = signal.stft(taps, SR, nperseg=256)
    tail = signal.istft(z * rack_gain(-60 * t / read(decay, hz)[:, None]), SR, nperseg=256)[1]
    return signal.oaconvolve(x, tail / np.linalg.norm(tail))[:N]


def hush():
    # hz, level_db (per Hz)
    hush_spectrum = [(15, -46), (30, 0.5), (76, 3), (313, -14), (483, -25), (617, -23), (3410, -23),
                     (15500, -44), (15900, -89)]
    level = rack_gain(-62 + 1.5 + 1.5 * wobble(.06))
    return level * evened(colour(rng.standard_normal(N), hush_spectrum))


def scattered(mid):
    # hz, side_db (re mid)
    side_width = [(60, -28), (180, -31), (550, -23), (1650, -22), (4970, -15.5), (15000, -17)]
    hz, _, z = signal.stft(mid, SR, nperseg=256)
    turns = np.exp(2j * np.pi * rng.random(z.T.shape)).T
    scatter = turns * rack_gain(read(side_width, hz) + 4.5)[:, None]
    side = signal.istft(z * scatter, nperseg=256)[1][:N]
    return side - 0.0086 * mid


def scene():
    near = brush() + box() + snaps() + thumps() + stand() + tips() + lurches() + knocks()
    mid = near + rack_gain(-14.5) * garage(near) + hush()
    side = scattered(mid)
    return np.array([mid + side, mid - side])


def band_limit(x):
    return signal.sosfilt(signal.butter(12, 16990, fs=SR, output="sos"), x)


def record(dry):
    # hz, level_db (a bin)
    stereo_threshold = [(300, -50), (2000, -55), (6000, -59), (14000, -58)]
    dry = signal.sosfilt(signal.ellip(6, 1, 30, 15900, fs=SR, output="sos"), dry)
    dry = signal.sosfilt(signal.butter(4, 32, "high", fs=SR, output="sos"), dry)
    mid, side = dry.mean(0), (dry[0] - dry[1]) / 2
    hz, _, z = signal.stft([mid, side], SR, nperseg=1024)
    band = np.arange(len(hz)) // 19
    power = uniform_filter1d(abs(z[0]) ** 2, 90, 0)[band * 19]
    band_db = 10 * np.log10(power + 1e-20)
    luck_db = 3.5 * rng.standard_normal((z.shape[2], band[-1] + 1)).T[band]
    kept = band_db + luck_db > read(stereo_threshold, hz)[:, None]
    side = signal.istft(z[1] * kept, nperseg=1024)[1][:N]
    return band_limit(np.array([mid + side, mid - side]))


dry = scene()
out = record(dry)
master_out(out)
```